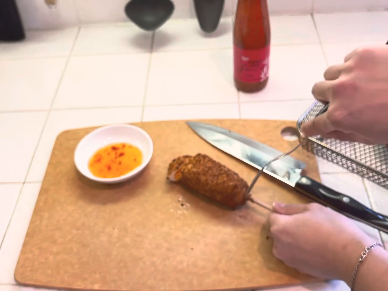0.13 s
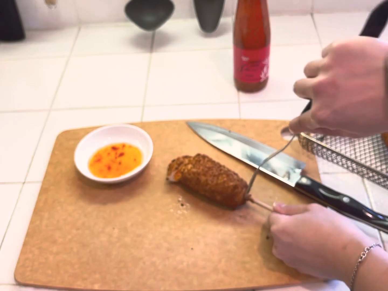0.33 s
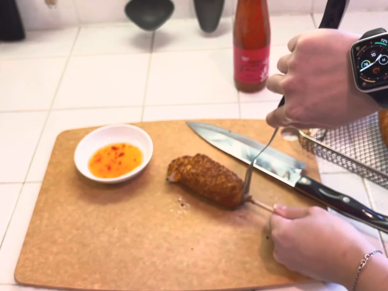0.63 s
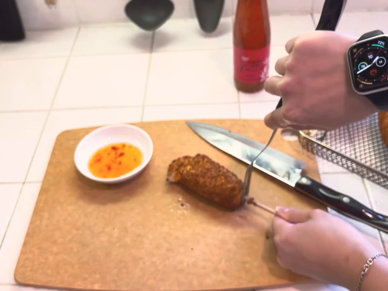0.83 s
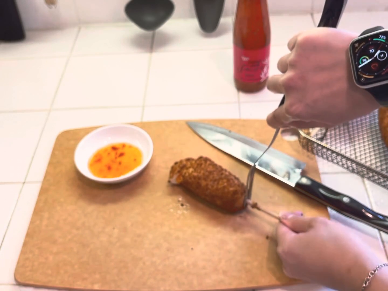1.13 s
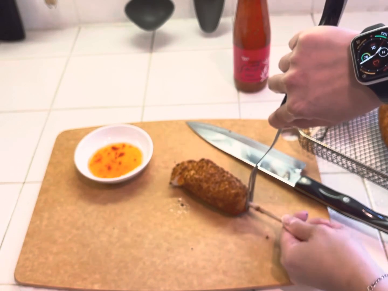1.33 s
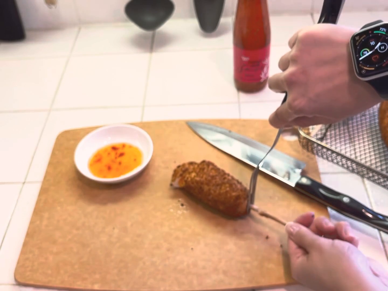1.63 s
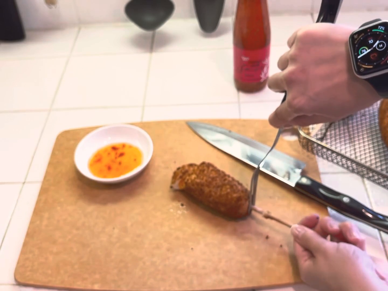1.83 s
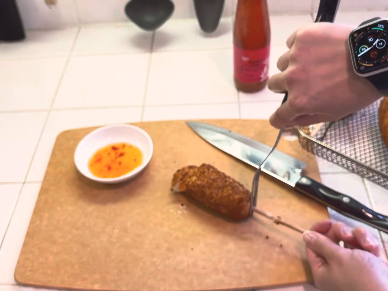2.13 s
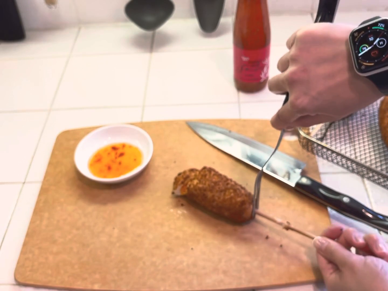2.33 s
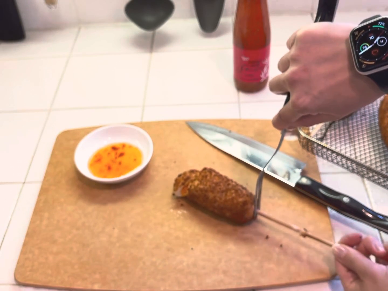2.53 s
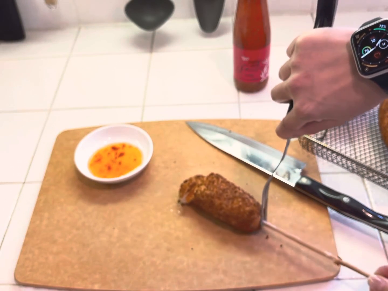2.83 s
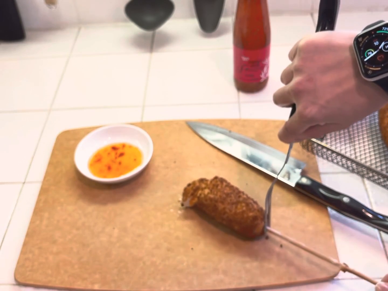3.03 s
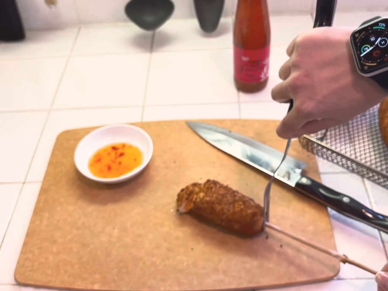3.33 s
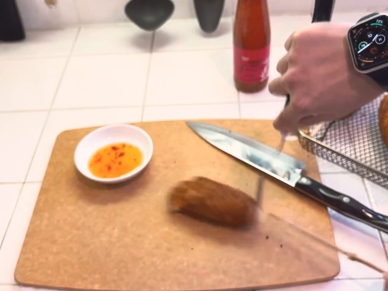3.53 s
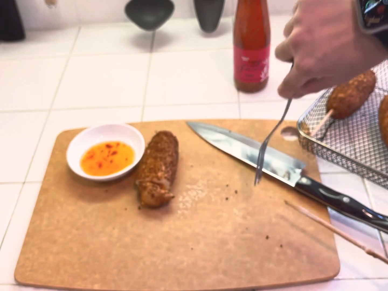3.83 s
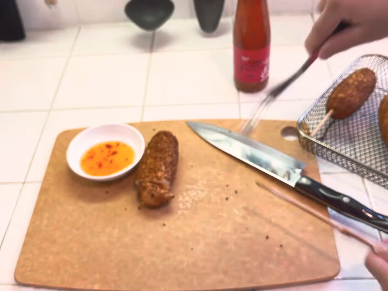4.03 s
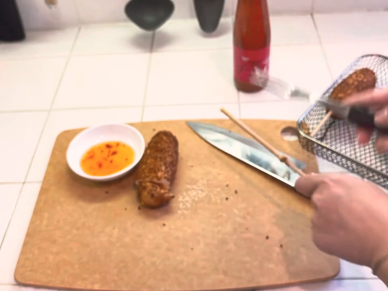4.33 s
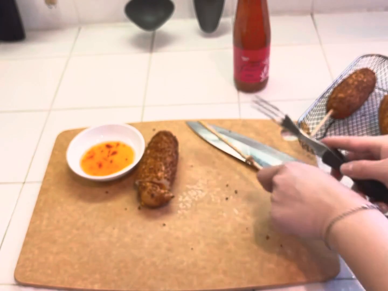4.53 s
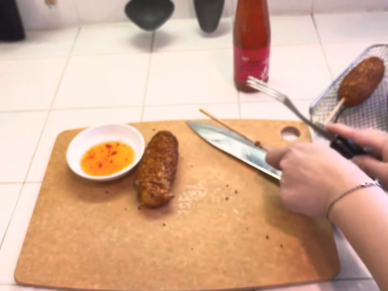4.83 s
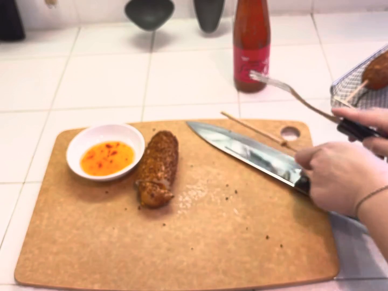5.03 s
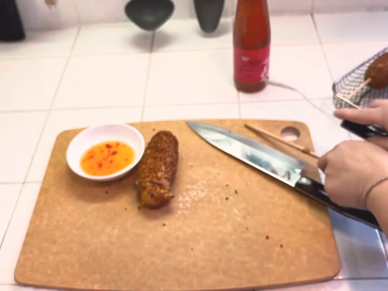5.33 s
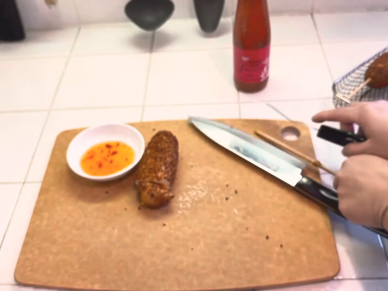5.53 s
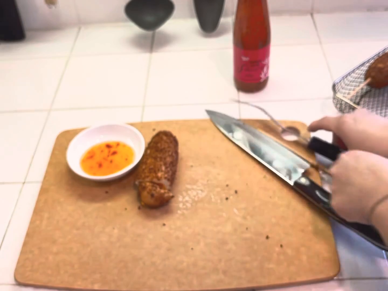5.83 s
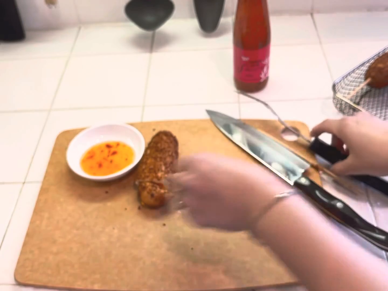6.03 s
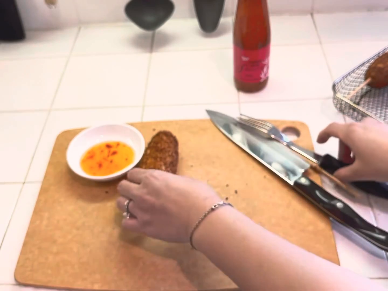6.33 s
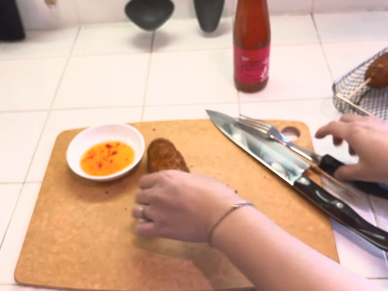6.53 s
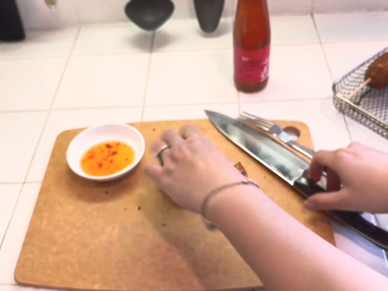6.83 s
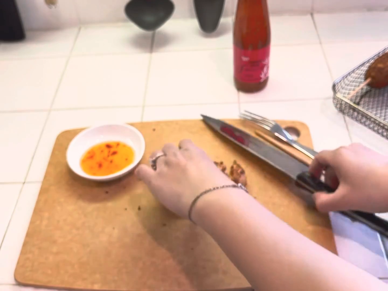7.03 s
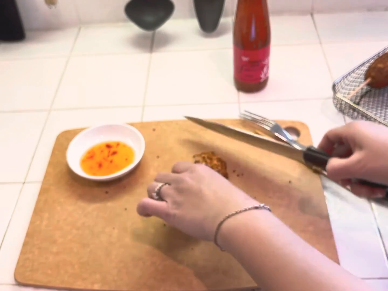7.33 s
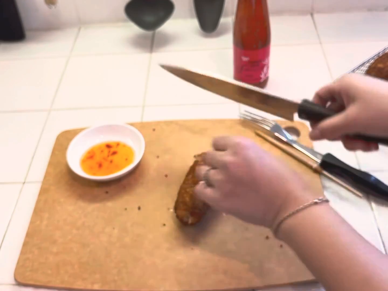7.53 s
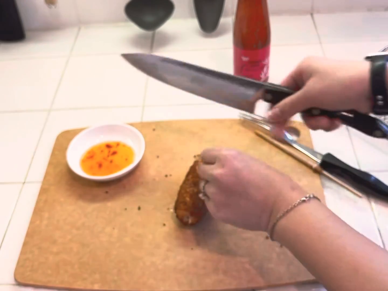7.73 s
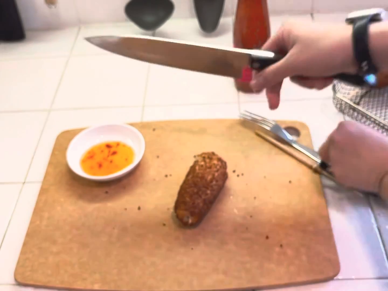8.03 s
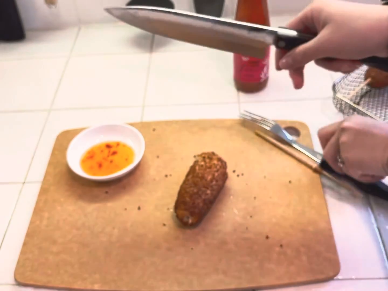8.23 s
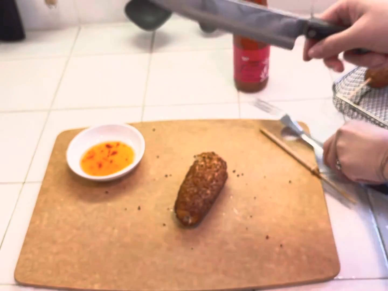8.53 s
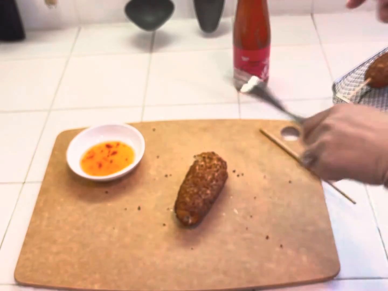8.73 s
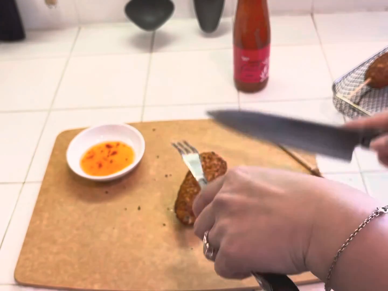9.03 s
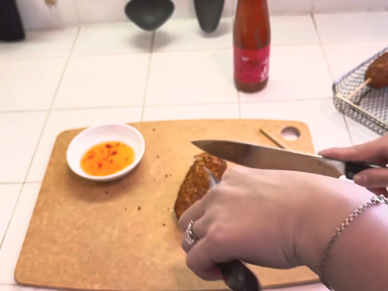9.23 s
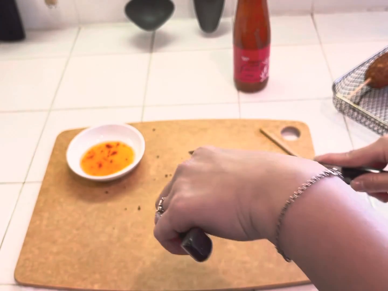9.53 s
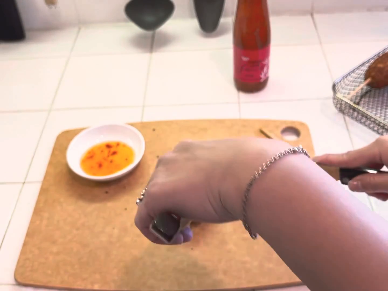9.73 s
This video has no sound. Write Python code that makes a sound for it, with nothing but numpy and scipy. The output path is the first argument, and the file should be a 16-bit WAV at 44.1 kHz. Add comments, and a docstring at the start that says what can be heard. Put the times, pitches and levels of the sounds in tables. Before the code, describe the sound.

Crisp fried batter crackles as a wooden skewer creaks out, cutlery knocks and clinks on a board, then a knife saws crust.

```python
"""Close stereo take of a battered sausage on a cutting board, in a tiled kitchen with a faint appliance hum.
The crust crackles in short fractures as a skewer is twisted, then drawn out creaking under friction.
The sausage skids free, the fork hits the board, knife and fork are set down: knocks and ringing steel modes.
The cutlery rocks in soft falling blips, the sausage is dragged with a gritty scuff,
and at the end the knife saws through the crust in strokes of crumbling noise."""
import sys
import numpy as np
from scipy import signal
from scipy.fft import rfft, irfft, next_fast_len
from scipy.io import wavfile
from scipy.ndimage import uniform_filter1d

SR = 44100
rng = np.random.default_rng(int(sys.argv[2]) if len(sys.argv) > 2 else 0)


def pcm_store(signal):
    """Save signal as 16-bit PCM."""
    levels = np.round(np.clip(np.atleast_2d(signal), -1, 1) * 32767)
    wavfile.write(sys.argv[1], SR, levels.astype(np.int16).T)


N = 436590
TIME = np.arange(N) / SR

# Resonances of the cutting board. Each row: centre in Hz, width in Hz, lift over the smooth colour in dB.
BOARD_RESONANCES = [(488, 120, 7), (652, 180, -2.5), (1036, 160, 7.5), (1787, 75, 10), (2850, 160, 2.5)]
# Colour of crumbling batter. Each row: frequency in Hz, relative power per Hz in dB.
CRUMBLE_COLOUR = [(150, -9), (450, 1.5), (1800, 2.5), (3000, 6.5), (5000, -1.5), (7000, -10), (12000, -8),
                  (16000, -27)]
# Colour of bright grit and steel ticks. Each row: frequency in Hz, relative power per Hz in dB.
GRIT_COLOUR = [(1200, -17), (3000, -7.5), (5000, 0), (7000, -2.5), (9000, 5.5), (12000, 3), (16000, -15)]


def from_db(db):
    """Decibels to gain."""
    return 10 ** (np.asarray(db) / 20)


def unit(x):
    """Scale each channel to energy 1."""
    energy = np.sum(x ** 2, axis=-1, keepdims=True)
    return x / np.sqrt(energy + 1e-20)


def at_hz(points, hz):
    """Read a table of (Hz, value) on a log-frequency axis."""
    f, value = np.transpose(points)
    return np.interp(np.log(np.maximum(hz, 1)), np.log(f), value)


def dying(t60, seconds):
    """Exponential decay that falls 60 dB in t60 seconds."""
    return from_db(-60 * TIME[:int(seconds * SR)] / t60)


def add(track, s, sound):
    """Mix a sound in at time s."""
    start = max(int(s * SR), 0)
    track[..., start:start + sound.shape[-1]] += sound[..., :N - start]


def convolve(x, response):
    """Convolve along time, cut to the scene's length."""
    return signal.oaconvolve(np.atleast_2d(x), np.atleast_2d(response), axes=-1)[:, :N]


def response_of(spectrum, modes=(), size=4096):
    """Causal (minimum-phase) impulse response of a smooth spectrum with resonances on it."""
    hz = np.fft.rfftfreq(size, 1 / SR)
    resonances_db = sum(lift / (1 + (2 * (hz - f) / width) ** 2) for f, width, lift in modes)
    db = at_hz(spectrum, hz) + resonances_db
    # folding the cepstrum onto positive times gives the minimum phase
    cepstrum = irfft(np.log(from_db(db)))
    cepstrum[1:size // 2] *= 2
    cepstrum[size // 2 + 1:] = 0
    return irfft(np.exp(rfft(cepstrum)))


def coloured(x, spectrum, modes=()):
    """Colour a white excitation, keeping its power."""
    return convolve(x, unit(response_of(spectrum, modes)))


def stereo_noise(size, side_db):
    """White noise, partly shared by both channels; side_db is the side level relative to the middle."""
    mid, side = rng.standard_normal((2, size))
    side_gain = from_db(side_db)
    return (mid + side_gain * side * [[1], [-1]]) / np.hypot(1, side_gain)


def blows(times, levels_db, t60, spike, side_db, tint=0, swell_s=1 / SR):
    """Each contact is a spike and a dense shudder that builds and dies, tinted by a resonance of its own."""
    out, decay = np.zeros((2, N)), dying(t60, .2)
    envelope = decay * (1 - np.exp(-TIME[:len(decay)] / swell_s))
    for s, db in zip(times, levels_db):
        shudder = stereo_noise(len(envelope), side_db) * envelope
        shudder[:, 0] = spike
        own = signal.iirpeak(rng.uniform(2000, 12000), 2, fs=SR)
        tinted = shudder + tint * signal.lfilter(*own, shudder)
        add(out, s, from_db(db) * tinted)
    return out


def friction(per_s, spread_db, side_db):
    """Tiny fractures of uneven size at random moments, each a millisecond of fizz; rms near 1."""
    happens = rng.random(N) < per_s / SR
    sizes = from_db(spread_db * np.minimum(rng.exponential(1, N), 4.5)) * happens
    fade = np.exp(-1 / (.0006 * SR))
    power = signal.lfilter([1], [1, -fade], sizes ** 2 + 1e-12)
    return np.sqrt(power / power.mean()) * stereo_noise(N, side_db)


def strokes(rows, column):
    """Gain over time: each stroke speeds up and slows down again, and catches unevenly on the way."""
    out = np.zeros(N)
    for row in rows:
        length = max(int((row[1] - row[0]) * SR), 2)
        add(out, row[0], from_db(row[column]) * signal.windows.hann(length) ** .7)
    catch_times = TIME[::SR // 30]
    grip_db = np.interp(TIME, catch_times, rng.normal(0, 1.3, len(catch_times)))
    return out * from_db(grip_db)


def patchy(x, patchy_db=2.0):
    """As the point of contact moves, narrow resonances swell and fade, each on its own."""
    spectra = signal.stft(x, nperseg=512)[2]
    patches = rng.standard_normal(spectra.shape[1:])
    for _ in range(2):
        across_pitch = uniform_filter1d(patches, size=4, axis=0)
        patches = uniform_filter1d(across_pitch, size=10, axis=1)
    gain = from_db(patchy_db * patches / patches.std())
    return signal.istft(spectra * gain)[1][:, :N]


def appliance_hum():
    """The kitchen's steady background: wide noise with the resonances of an appliance hum."""
    # Each row: frequency in Hz, relative power per Hz in dB.
    room_tone = [(15, -31), (50, 0), (125, -10.5), (270, -14), (1250, -22.5), (2500, -30.5), (4700, -46.5),
                 (11500, -48), (14000, -66)]
    # Each row: centre in Hz, width in Hz, lift in dB.
    hum_modes = [(49.7, 3.7, 1), (265.2, 19, 4.5), (1300, 17, 14)]
    return from_db(-58.5) * coloured(stereo_noise(N, -10), room_tone, hum_modes)


def flakes():
    """Small random fractures under pressure, as rows of (s, dB)."""
    # Pressure on the crust: steel pressing in, and in the third row the skewer's tip catching as it comes out.
    # Each row: start in seconds, end in seconds, flakes per second.
    pressing = [(0.2, 0.7, 12), (1.05, 1.95, 9), (3.051, 3.2, 25), (9.45, 9.85, 14)]
    largest_db, range_db = -52.5, 13.5
    per_s = sum(rate * ((TIME > start) & (TIME < end)) for start, end, rate in pressing)
    chance, smallness = rng.random((2, N))
    return np.column_stack([TIME, largest_db - range_db * smallness])[chance < per_s / SR]


def twists(count=5):
    """Evenly paced turns of the skewer, each shorter than the last, as rows of (start s, end s, dB)."""
    first_s, period_s, length_s, shrink, level_db = 0.6665, 0.3359, 0.34, 0.85, -57.5
    starts = first_s + period_s * np.arange(count)
    return [(s, s + length_s * shrink ** k, level_db) for k, s in enumerate(starts)]


def crust():
    """Fried batter crumbles in fine grains under skewer and knife, with a louder snap now and then."""
    # The loudest snaps. Each row: time in seconds, level in dB.
    loud_snaps = [(0.0293, -47.5), (0.263, -43), (0.2996, -42), (0.5049, -43), (0.696, -44.5),
                  (1.3449, -46), (1.8374, -49.5), (2.371, -49), (9.41, -47.5), (9.7995, -49.5)]
    # Colour of a snap. Each row: frequency in Hz, relative power per Hz in dB.
    snap_colour = [(400, -11.5), (1400, -4), (2400, 1.5), (6000, -5), (12000, 1.5), (16000, -21)]
    # Knife strokes. Each row: start in seconds, end in seconds, level in dB.
    saw_strokes = [(9.275, 9.345, -59), (9.455, 9.6, -49.5), (9.78, 9.895, -53.5)]
    s, db = np.vstack([loud_snaps, flakes()]).T
    snaps = coloured(blows(s, db, t60=0.052, spike=7.0, side_db=-9.5, tint=0.3), snap_colour)
    sawing = strokes(saw_strokes, column=2)
    twisting = strokes(twists(), column=2)
    crumbs = (twisting + sawing) * friction(per_s=450, spread_db=3, side_db=-10)
    # bright grit under the blade, 4 dB below its crumbling
    grit = from_db(-4) * sawing * friction(per_s=560, spread_db=3.5, side_db=-9.5)
    crumbling = coloured(crumbs, CRUMBLE_COLOUR, BOARD_RESONANCES) + coloured(grit, GRIT_COLOUR)
    return snaps + patchy(crumbling)


def contacts_of(landing, count=3):
    """One end touches, the other follows and bounces to rest; rows of (s, body dB, edge dB)."""
    bounce_shrink, bounce_loss_db = .85, 6  # each bounce comes sooner and weaker than the last
    dulling = 0.17  # dB of hard edge lost for each dB that a contact is weaker than the main blow
    s, lag, first_db, second_db, hard_db = landing
    bounce = np.arange(count)
    times = np.append(s, s + np.cumsum(lag * bounce_shrink ** bounce))
    body_db = np.append(first_db, second_db - bounce_loss_db * bounce)
    edge_db = body_db + hard_db - dulling * (body_db.max() - body_db)
    return np.column_stack([times, body_db, edge_db])


def board():
    """Knocks sound the board's resonances under a bright edge; a few separate soft low bumps sound on the counter."""
    # Things landing one end first, and last a dry tick as the fork is lifted. Each row: time in seconds, lag of
    # the second end in seconds, first end in dB, second end in dB, hard edge over body in dB (the body is then
    # mixed 10 dB lower).
    landings = [(0.98, 0.028, -38.5, -33.5, -19.5), (3.552, 0.021, -15, -29.5, -16),
                (3.577, 0.002, -10, -7, -4), (3.644, 0.009, -20, -15, -12.5),
                (3.690, 0.0093, -18.5, -33, -11.5), (4.645, .012, -33.5, -34.5, -8),
                (4.729, 0.0091, -15, -11.5, -28), (4.761, 0.019, -4.5, -6, -31),
                (4.979, 0.014, -14.5, -30, -41), (5.553, 0.029, -35.5, -25, 4.5),
                (5.648, 0.019, -9, -6.5, -9.5), (5.817, .011, -22.5, -33, -45),
                (6.025, 0.021, -22, -20, -34), (6.12, 0.01, -13.5, -10, -20.5),
                (6.163, 0.0073, -15.5, -16.5, -9), (6.185, 0.017, -14, -14.5, -11),
                (6.681, .018, -29, -30.5, -12), (6.721, 0.046, -25.5, -27, -21),
                (6.823, 0.015, -12.5, -14.5, -6.5), (7.912, 0.0055, -33.5, -31, -22),
                (8.192, 0.025, -34.5, -28.5, -18.5), (8.248, 0.014, -26, -22, -17.5),
                (8.276, 0.03, -25.5, -32, -18), (8.692, 0.0035, -55, -66, 15)]
    # Soft bumps on the counter. Each row: time in seconds, level in dB before a 5 dB cut.
    bumps = [(4.654, -36.5), (4.773, -29), (8.383, -42.5)]
    # Colours of the knock's body and edge. Each row: frequency in Hz, relative power per Hz in dB.
    body_colour = [(70, -22.5), (170, -11.5), (350, -2.5), (900, 4), (1700, -4.5), (2600, -12),
                   (9000, -53.5)]
    edge_colour = [(500, -28), (1500, 9.5), (2500, 7.5), (4200, 0.5), (6000, -9), (9000, -10),
                   (16000, -26.5)]
    bump_colour = [(35, -20.5), (95, 4.0), (260, -10.0), (2000, -67.0)]  # likewise
    s, body_db, edge_db = np.vstack([contacts_of(landing) for landing in landings]).T
    knocks = blows(s, body_db - 10.0, t60=0.098, spike=2.2, side_db=-12.5, swell_s=0.0009)
    body = coloured(knocks, body_colour, BOARD_RESONANCES)
    hard_contacts = blows(s, edge_db, t60=.05, spike=2, side_db=-8, tint=.7, swell_s=.0006)
    edge = coloured(hard_contacts, edge_colour, BOARD_RESONANCES)
    s, bump_db = np.transpose(bumps)
    low_bumps = coloured(blows(s, bump_db - 5.0, t60=0.16, spike=4.4, side_db=-17.5), bump_colour)
    return patchy(body) + edge + low_bumps


def skewer():
    """The wooden skewer creaks through the batter, louder the harder it is pulled, and ticks where it catches."""
    # Force of the pull as it is drawn out. Each row: time in seconds, level of its rubbing in dB.
    pull = [(2.25, -84), (2.308, -59), (2.442, -69.5), (2.586, -49), (2.626, -59), (2.684, -48),
            (2.712, -67), (2.746, -51.5), (3.038, -67.5), (3.188, -62.5), (3.26, -91.5)]
    # The tip catching on its way out. Each row: time in seconds, level in dB.
    tip_catches = [(3.106, -45), (3.134, -43.5), (3.166, -47.5)]
    # Creak of the wood. Each row: centre in Hz, width in Hz, lift in dB.
    wood_modes = [(1050, 96, 14), (1840, 170, 9.5), (4540, 370, 6), (6116, 600, 8), (8440, 2940, 7.5)]
    s, db = np.transpose(pull)
    pulling = (TIME > s[0]) & (TIME < s[-1])
    force = from_db(np.interp(TIME, s, db)) * pulling
    ticks = blows(*np.transpose(tip_catches), t60=.05, spike=2, side_db=-10)
    slips = force * friction(per_s=800, spread_db=2.2, side_db=-12.5)
    return coloured(slips + ticks, CRUMBLE_COLOUR, wood_modes)


def sliding():
    """Rough batter rubbing over the board gives fine grit and a shifting scuff in its upper resonances."""
    # Each row: start in seconds, end in seconds, scuff in dB, grit in dB.
    slides = [(3.36, 3.6, -38, -37.5), (6.17, 6.71, -42.5, -52.5), (6.66, 6.81, -59.5, -65),
              (6.88, 7.23, -45.5, -54), (7.42, 7.85, -94.5, -65)]
    # Colour of the scuff. Each row: frequency in Hz, relative power per Hz in dB.
    scuff_colour = [(150, -11), (400, -1), (1400, -1.5), (2600, 3.5), (4000, -1), (16000, -22)]
    scuff = strokes(slides, column=2) * friction(per_s=1200, spread_db=2, side_db=-11)
    grit = strokes(slides, column=3) * friction(per_s=3500, spread_db=2, side_db=-7.5)
    return patchy(coloured(scuff, scuff_colour, BOARD_RESONANCES[-2:]) + coloured(grit, GRIT_COLOUR))


def cutlery(clinks, modes, low_edge_hz, tick_db, split=0.005):
    """Steel ticks and rings in its modes: a tap on the tip wakes the high ones, a flat landing the low ones."""
    times, tap_db, _ = np.transpose(clinks)
    out = coloured(blows(times, tap_db + tick_db, t60=0.085, spike=0.89, side_db=-9.0), GRIT_COLOUR)
    for s, high_db, low_db in clinks:
        for hz, db, t60 in modes:
            decay = dying(t60, 0.87)
            t = TIME[:len(decay)]
            angle = 2 * np.pi * hz * t
            struck_db = low_db if hz < low_edge_hz else high_db
            strength = from_db(db + struck_db + rng.normal(0, 1.8, (2, 1)))
            phase = rng.uniform(0, 2 * np.pi) + rng.normal(0, 0.81, (2, 1))
            # contact with the board splits off a nearby, faster-dying mode that beats with the main one
            detune = 1 + rng.choice([-1, 1]) * rng.uniform(1, 2.2) * split
            twin = .5 * decay ** 2 * np.sin(angle * detune)
            # the loose steel chatters on the board, so the ring flutters
            touches = t[::SR // 70]
            flutter = from_db(np.interp(t, touches, rng.normal(0, 2.5, len(touches))))
            add(out, s, strength * flutter * (decay * np.sin(angle + phase) + twin))
    return out


def fork():
    """The fork's clinks: bending modes below 6 kHz sound with flat landings, higher ones with taps."""
    # Each row: time in seconds, tap in dB (its tick is 3 dB up), lowest bending modes in dB.
    fork_clinks = [(3.580, -35, -26.5), (5.519, -38, -52), (5.584, -37, -48), (5.608, -50, -40.5),
                   (5.657, -28, -31), (6.823, -37, -54)]
    # Each row: mode in Hz, relative level in dB, t60 in seconds.
    fork_modes = [(415, -7, .3), (1020, 2, .08), (1355, -7, .26), (1730, -5, .22), (2091, 1, .36),
                  (2422, -10, .16), (3950, -13, .12), (4570, -13, .13), (5480, -18, .13), (6680, -10, .24),
                  (7960, -5, .08), (8963, 0, .08), (11170, -9, .1), (12240, -6, .07)]
    return cutlery(fork_clinks, fork_modes, low_edge_hz=6000, tick_db=3.0)


def knife():
    """The knife blade's clinks: bending modes below 3.2 kHz sound with flat landings, higher ones with taps."""
    # Each row: time in seconds, tap in dB (its tick is 1.5 dB down), lowest bending modes in dB.
    knife_clinks = [(4.727, -16.5, -37), (4.781, -33, -21.5), (4.959, -30.5, -40.5)]
    # Each row: mode in Hz, relative level in dB, t60 in seconds.
    knife_modes = [(974, -1, .28), (1213, -9, .52), (1986, 5, .45), (2880, -17, .4), (3545, -18, .16),
                   (4118, -19, .33), (4803, -19, .24), (5790, -18, .29), (6145, -17, .24), (6476, -17, .22),
                   (6700, -4, .09), (7590, -9, .15), (8800, -4, .08), (10690, -4, .13), (10990, -11, .14),
                   (11880, -6, .11)]
    return cutlery(knife_clinks, knife_modes, low_edge_hz=3200, tick_db=-1.5)


def rocking(high_hz=1090, low_hz=850, glide_s=0.006, return_share=0.33, shrink=0.97):
    """Each swing rolls over the contact twice, a soft blip falling in pitch; the swings slowly quicken."""
    # Cutlery on its handle. Each row: start in seconds, end in seconds, first period in seconds,
    # level in dB, fade in dB per second.
    rocks = [(5.09, 6.027, .0802, -47, -2.5), (7.215, 9.25, .066, -54.5, -7.5)]
    out, t = np.zeros(N), TIME[:SR // 20]
    pitch = low_hz + (high_hz - low_hz) * np.exp(-t / glide_s)
    rise = t / .004
    swell = (rise * np.exp(1 - rise)) ** 2
    blip = np.sin(2 * np.pi * np.cumsum(pitch) / SR) * swell
    for start, end, period, db, fade_db in rocks:
        s = start
        while s < end:
            for lag in (0, return_share * period):
                add(out, s + lag, from_db(db + fade_db * (s - start) + rng.normal(0, 1)) * blip)
            s += period
            period = max(period * shrink, .04)
    return out


def kitchen(x, tiles_db=-9, tiles_t60=.065, tail_db=-12):
    """Quick reflections off the tiled counter, then a short tail; both are decaying noise."""
    t = TIME[:SR]
    room_t60 = 0.42
    tiles = unit(stereo_noise(SR, -21.0) * dying(tiles_t60, 1) * (t > .002))
    tail = unit(stereo_noise(SR, -11.5) * dying(room_t60, 1) * (t > .008))
    return convolve(x, from_db(tiles_db) * tiles + from_db(tail_db) * tail)


def scene():
    """Everything on the board, heard in the kitchen over a faint hum."""
    # Side on which the hands work. Each row: time in seconds, left minus right in dB.
    work_side = [(3.8, -0.5), (4.7, 1), (5.1, -5.5), (5.5, 0.5)]
    side_db = np.interp(TIME, *np.transpose(work_side))
    side = from_db(side_db * [[1], [-1]] / 2)
    work = side * (crust() + board() + skewer() + sliding() + rocking())
    steel = fork() + knife()
    work_heard = work + kitchen(work)
    steel_heard = steel + kitchen(steel, tiles_db=-11.0, tail_db=-18.0)
    return work_heard + steel_heard + appliance_hum()


def record(dry):
    """Two microphone ports differ in phase and level and share treble notches; peaks are rounded, the top cut."""
    # Each row: frequency in Hz, phase by which the left leads in radians.
    port_phase = [(100, 0.5), (2400, 1.18), (5500, 0.69), (7600, 1.14), (9200, -1), (11800, -6)]
    # Each row: frequency in Hz, left minus right in dB.
    port_balance = [(300, -0.5), (2000, 0.5), (5000, 3), (8500, 0)]
    # Response shared by both ports. Each row: frequency in Hz, gain in dB.
    microphone = [(9400, 1.5), (9900, 0.5), (10250, -27), (10700, 3), (12100, 0), (13300, -23),
                  (15500, -20)]
    cutoff_hz = 15900
    size = next_fast_len(N + SR // 10)
    hz = np.fft.rfftfreq(size, 1 / SR)
    # half of each difference goes to the left port, the inverse to the right
    port = from_db(at_hz(port_balance, hz) / 2) * np.exp(.5j * at_hz(port_phase, hz))
    heard = irfft(rfft(dry, size) * np.array([port, 1 / port]), size)[:, :N]
    heard = convolve(heard, response_of(microphone))
    rounded = heard / (1 + (heard / .85) ** 4) ** .25
    top_cut = signal.ellip(10, .1, 80, cutoff_hz, fs=SR, output="sos")
    return signal.sosfilt(top_cut, rounded)


dry = scene()
out = record(dry)
pcm_store(out)
```